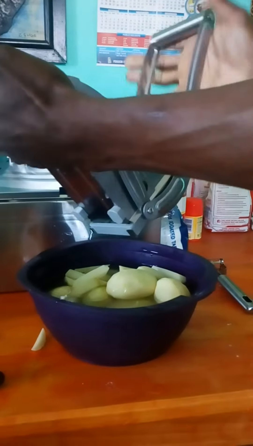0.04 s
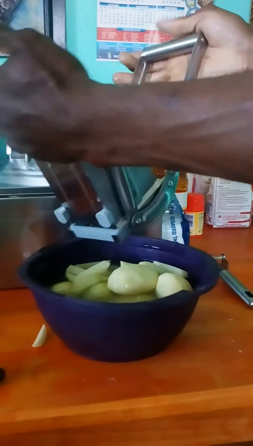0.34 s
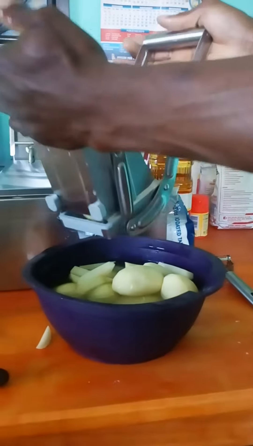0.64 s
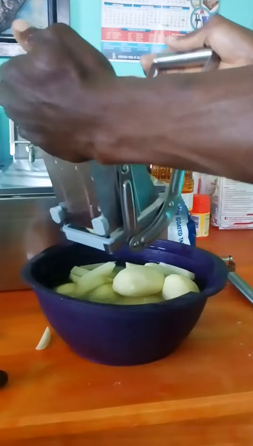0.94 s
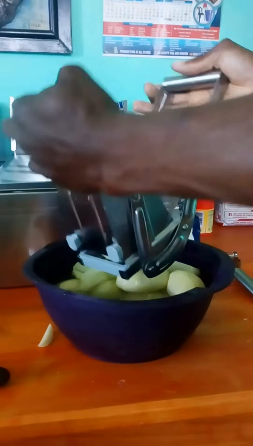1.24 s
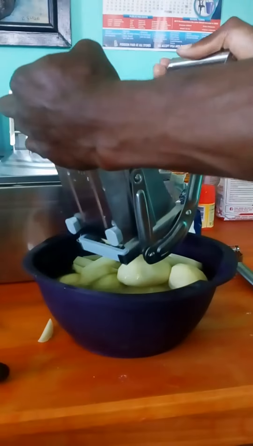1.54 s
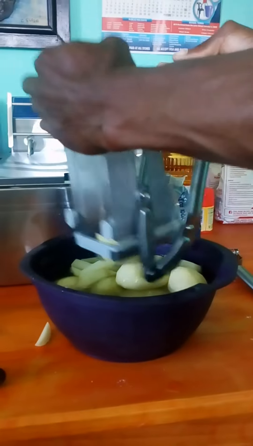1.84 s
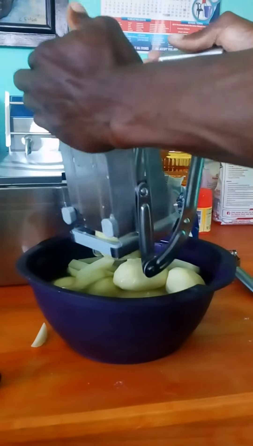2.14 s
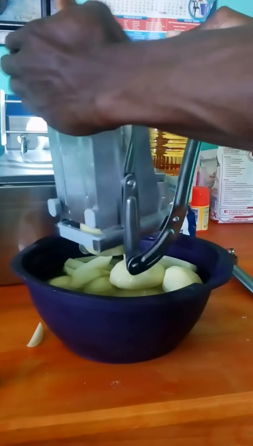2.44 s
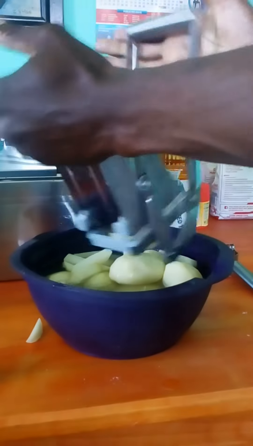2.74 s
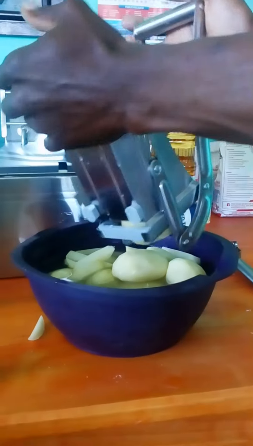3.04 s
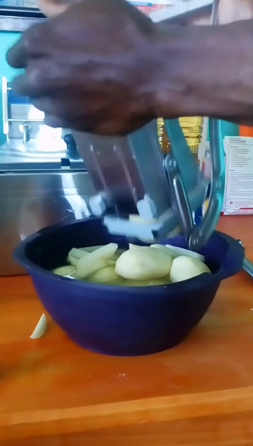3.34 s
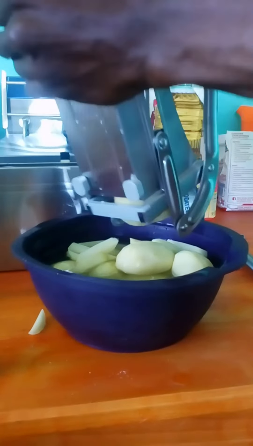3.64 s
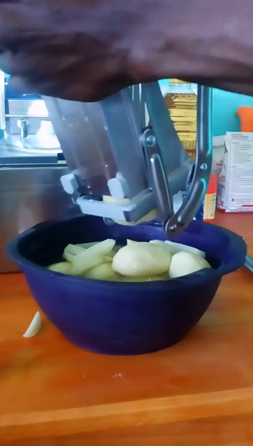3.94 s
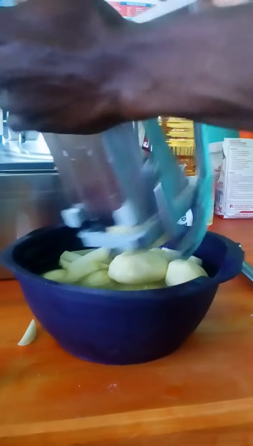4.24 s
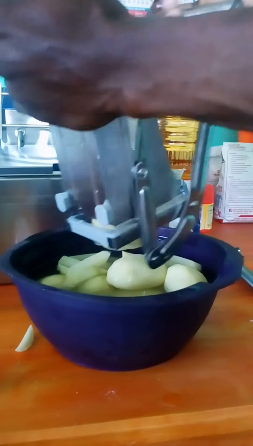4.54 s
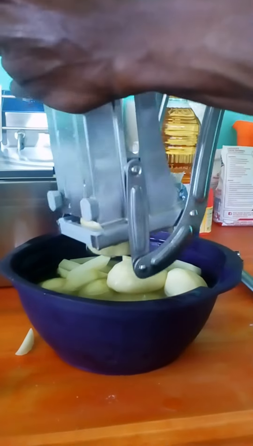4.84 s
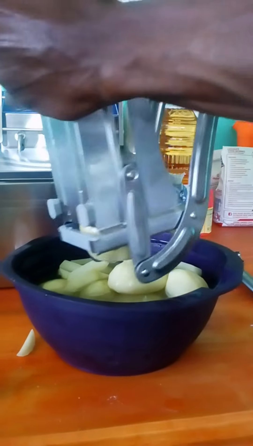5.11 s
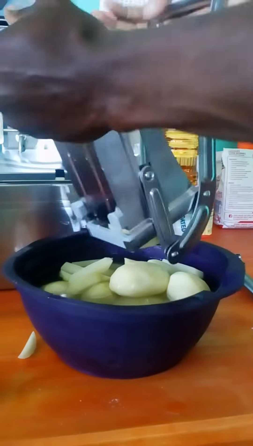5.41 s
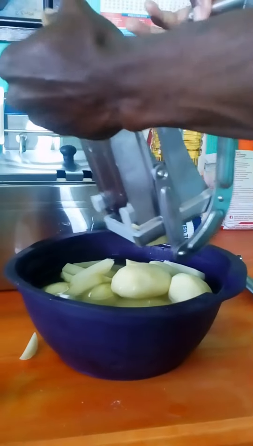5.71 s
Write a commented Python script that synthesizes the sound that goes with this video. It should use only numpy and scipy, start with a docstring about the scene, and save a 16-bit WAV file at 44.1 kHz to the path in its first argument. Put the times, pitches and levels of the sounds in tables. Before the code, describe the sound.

Close by, the loose joints of a metal potato cutter click and its pusher scrapes briefly along the guide. The pusher slams against its stop with a bright steel clack and a soft low thump. Things go nearly quiet, then a run of small metallic ticks and knocks builds to another loud clack. The small kitchen adds a short echo and a faint, steady motor hum with hiss.

```python
"""A steel lever chip cutter is worked over a bowl in a small kitchen. Twice its pusher drives a potato
through the blade grid and clashes against its stop. The loose linkage clicks, and each hit of steel on
steel makes the frame ring. The pusher scrapes along its guide. There are soft low thumps on the frame
and one faint, drawn-out groan. A motor, likely a fridge compressor, throbs faintly behind mains hum
and hiss."""
import sys
import numpy as np
from scipy import signal
from scipy.fft import rfft, irfft, next_fast_len
from scipy.io import wavfile
from scipy.ndimage import uniform_filter1d

SR = 44100
rng = np.random.default_rng(int(sys.argv[2]) if len(sys.argv) > 2 else 0)


def wav_record(signal):
    """Record a signal, one row per channel, as 16-bit PCM in the file named by sys.argv[1]."""
    frames = np.transpose(np.atleast_2d(signal))
    bounded = np.clip(frames, -1, 1)
    # unit amplitude maps onto the largest positive 16-bit level
    quanta = np.round(bounded * 32767).astype(np.int16)
    wavfile.write(sys.argv[1], SR, quanta)


N = 263277

# How long the kitchen echoes; a fade time is the time to drop 60 dB: (frequency [Hz], fade time [s])
ECHO_FADES = [(200, 0.346), (800, 0.264), (2100, 0.358), (5500, 0.2496), (15000, 0.226)]
# The tone of the background hiss: (frequency [Hz], relative level [dB])
HISS_TONE = [(20, -4.5), (40, -5), (90, 6), (200, 0.5), (400, -0.5), (750, -5.5), (1400, -5), (2500, -8.5),
             (4500, -10), (6300, -7.5), (7300, -14), (15500, -10.5)]
# Resonances of the motor's casing: (pitch [Hz], width [Hz], relative level [dB])
CASING_RESONANCES = [(151.8, 131.2, 1.5), (237, 121, -7.5), (531, 84.8, 4), (1088, 101, 0),
                     (1686, 260, -8.5)]
# Soft low thumps on the frame, and one faint, drawn-out groan:
# (middle time [s], half length [s], pitch [Hz], level [dB])
BUMPS_AND_GROAN = [(.9, 0.32, 570, -71.5), (1.758, 0.0063, 220, -60), (1.868, 0.0185, 354.3, -53),
                   (1.886, 0.0563, 172, -64.5), (2.804, 0.042, 90, -69.5), (2.902, 0.0336, 161.3, -64)]
# The notes at which the frame and blade grid ring: (pitch [Hz], relative level [dB], fade time [s])
FRAME_NOTES = [(779, 4, .28), (990, 0, .14), (1175, -2, .14), (1328, 1, .22), (1836, -3, .2),
               (2040, -2, .24), (2660, -7, .2), (2783, -6, .22), (3012, -4, .18), (3725, -3, .18),
               (3931, -4, .18), (4075, -3, .15), (4964, -4, .18), (5389, -3, .17), (5636, -3, .17),
               (5768, -4, .17), (5893, -4, .18), (6075, -2, .2), (6130, -3, .2), (6260, -5, .22),
               (6414, -1, .21), (6647, -1, .19), (6932, -1, .18), (7020, -1, .19), (7158, 0, .21)]
# Resonances of the pusher's guide: (pitch [Hz], width [Hz], relative level [dB])
GUIDE_RESONANCES = [(1010, 710, 1.5), (1738, 111, 7.5), (2840, 630, 1), (3954, 720, 1.5), (4642, 427, 7),
                    (5190, 140, 2)]
# The pusher sliding in its guide: (middle time [s], half length [s], relative level [dB])
SLIDES = [(0.11, 0.045, -66), (0.462, 0.0322, -59), (0.566, 0.01854, -38.5), (1.0, 0.19, -72),
          (1.79, 0.11, -66.5), (1.87, 0.01793, -32.5), (2.77, 0.0263, -65.5), (4.263, 0.04, -69),
          (5.535, 0.01598, -63.5), (5.954, 0.01236, -28.5)]
# The tone of a steel clack: (frequency [Hz], relative level [dB])
CLACK_TONE = [(150, -47), (420, -16), (750, -8), (1500, -4), (2150, -7.5), (2800, -3), (3900, -1.5),
              (4600, -5), (5400, -1), (8000, -7.5), (16000, -21.5)]
# Clicks of the loose linkage: (time [s], relative ping level [dB], knock level [dB], knock pitch [Hz],
# ping pitch [Hz], fade time [s], opening snap against the hit [dB], chatter length [s],
# first hit against the last [dB])
LINKAGE_CLICKS = [ (0.312, -54.5, -69.5, 1310, 6136, 0.041, -7, 0, -5),
                  (0.404, -46.5, -66.5, 1124, 6530, 0.1216, -20.5, 0.0114, 1.5),
                  (0.536, -40, -58.5, 1740, 6400, 0.07, -19.5, 0.0034, -1.5),
                  (0.6719, -43, -82, 1054, 6120, 0.0155, -3, 0.0194, -5),
                  (2.162, -58.5, -67.5, 1300, 6050, 0.0257, -7, 0, -0.5),
                  (3.3496, -42.5, -54, 1626, 5500, 0.0532, 8.5, 0.003, -6.5),
                  (4.0444, -54.5, -52, 987.5, 6703, 0.035, -2.5, 0.000097, 0),
                  (4.23, -67, -55.5, 1317, 6432, 0.0287, -16.5, 0.0025, 5),
                  (4.3823, -42, -42, 1307, 6373, 0.0402, -19.5, 0.00437, -8.5),
                  (4.5501, -52.5, -66, 1098, 5782, 0.0329, 3.5, 0.00016, -1.5),
                  (4.6294, -59, -49.5, 939.5, 5999, 0.0196, -14.5, 0, -1),
                  (4.6842, -53, -61.5, 1700, 6440, 0.0217, -6.5, 0, 0),
                  (4.7387, -45, -55, 1545, 6339, 0.0246, -6.5, 0, 0),
                  (4.8692, -46, -63, 1860, 5991, 0.0567, 5.5, 0.0096, -2.5),
                  (5.140, -59.5, -59, 1308, 6304, 0.0511, -17.5, 0.00029, -4.5),
                  (5.4413, -42, -53, 1141, 6643, 0.04316, -9.5, 0.0172, 4.5),
                  (5.523, -68.5, -52.5, 856, 6401, 0.02705, -8.5, 0.00032, 1.5),
                  (5.7671, -34, -62.5, 1100, 7040, 0.0293, -17, 0, 0)]
# Strokes through the grid: (first touch [s], stop time [s], relative ping level [dB], knock level [dB],
# knock pitch [Hz], ping pitch [Hz], sizzle level [dB], first touch against the stop [dB],
# rebound against the stop [dB])
CUTTING_STROKES = [(1.8367, 1.8733, -21.5, -29, 863.4, 7040, -35.5, -9.5, -14),
                   (5.9266, 5.945, -22, -21, 993.3, 6750, -24, -21.5, -4)]
# How the microphone colours the sound: (frequency [Hz], gain [dB])
MIC_TONE = [(6900, -1.5), (7400, -6), (8200, -11.5), (10000, -13), (13600, -16), (14500, -5), (15200, -5.5),
            (15700, -5)]


def amp(db):
    """Turn decibels into a gain to multiply by."""
    return 10 ** (np.asarray(db) / 20)


def unit(x):
    """Scale x to an average (rms) level of 1."""
    return x / np.sqrt(np.mean(x ** 2) + 1e-20)


def along(points, hz):
    """Read between the rows of a (frequency, value) table, on a log frequency scale."""
    f, values = np.transpose(points)
    return np.interp(np.log(hz + 1), np.log(f), values)


def filtered(x, response):
    """Shape x with a response: a function that gives the gain and phase at each frequency."""
    size = next_fast_len(len(x) + 8192)
    return irfft(rfft(x, size) * response(np.fft.rfftfreq(size, 1 / SR)), size)[:len(x)]


def resonance(f, hz, width_hz):
    """The response of something that vibrates most easily near one pitch."""
    return 1j * f * width_hz / (hz * hz - f * f + 1j * f * width_hz)


def highpass(f, corner_hz):
    """A response that steeply cuts everything below the corner."""
    return f ** 4 / np.sqrt(f ** 8 + corner_hz ** 8)


def noise(size, response):
    """Noise shaped by a response, at level 1."""
    return unit(filtered(rng.standard_normal(size), response))


def add(track, start_s, sound):
    """Mix a sound into the track at the given time."""
    start = round(start_s * SR)
    part = sound[:max(len(track) - start, 0)]
    track[start:start + len(part)] += part


def swell(middle_s, half_s):
    """A bell-shaped rise and fall around a moment."""
    return np.exp(-.5 * ((np.arange(N) / SR - middle_s) / half_s) ** 2)


def fade(t, fade_s):
    """A gain that drops by 60 dB every fade_s seconds."""
    return amp(-60 * t / fade_s)


def in_kitchen(x, echo_db):
    """Add the echo of the walls, in which the highest sounds die first."""
    hz, t, spectrum = signal.stft(rng.standard_normal(SR // 2), SR, nperseg=256)
    echo = signal.istft(spectrum * fade(t, along(ECHO_FADES, hz)[:, None]), SR, nperseg=256)[1]
    echo *= 1 - np.exp(-np.arange(len(echo)) / SR / 0.00614)  # reflections take a moment to build up
    return x + amp(echo_db) * signal.fftconvolve(x, echo / np.linalg.norm(echo))[:len(x)]


def hiss():
    """A steady, quiet hiss, strongest in the bass."""
    return amp(-62) * noise(N, lambda f: amp(along(HISS_TONE, f)))


def motor(knock_hz=24.368, mains_hz=50.1):
    """A soft knock every second turn of the shaft rings the casing, while the windings hum."""
    times = np.arange(.0365, N / SR - .01, 1 / knock_hz)
    knocks = np.zeros(N)
    knocks[(times * SR).astype(int)] = amp(rng.standard_normal(len(times)))
    casing = lambda f: sum(amp(db) * resonance(f, hz, width) ** 2 for hz, width, db in CASING_RESONANCES)
    throb = unit(in_kitchen(filtered(knocks, casing), echo_db=-13.5))
    hum = np.sin(2 * np.pi * mains_hz * np.arange(N) / SR)
    return amp(-70.5) * throb + amp(-63.5) * hum


def bumps_and_groan():
    """Swells of noise around one low pitch each: the short ones thump, the long one groans faintly."""
    return sum(amp(db) * swell(middle_s, half_s) * noise(N, lambda f: resonance(f, hz, width_hz=87) ** 2)
               for middle_s, half_s, hz, db in BUMPS_AND_GROAN)


def frame_ring(t, force):
    """Each note of the frame rings as hard as the force drives its pitch, give or take a little."""
    hz, db, fade_s = np.transpose(FRAME_NOTES)
    strengths = np.abs(force(hz)) * amp(db + 2 * rng.standard_normal(len(hz)))
    phases = rng.uniform(0, 2 * np.pi, (len(hz), 1))
    return strengths @ (np.sin(2 * np.pi * hz[:, None] * t + phases) * fade(t, fade_s[:, None]))


def slips():
    """Countless tiny slips of sliding steel: noise whose level flickers slightly."""
    grain = rng.standard_normal(N)
    flicker_db = 0.94 * unit(uniform_filter1d(rng.standard_normal(N), size=60))
    return grain * amp(flicker_db)


def scrapes():
    """The sliding pusher sounds its guide and sets the frame ringing."""
    ping = unit(filtered(slips(), lambda f: resonance(f, hz=6303, width_hz=920)))
    guide = lambda f: sum((-1) ** k * amp(db) * resonance(f, hz, width)
                          for k, (hz, width, db) in enumerate(GUIDE_RESONANCES))
    body = unit(filtered(slips(), lambda f: guide(f) * highpass(f, corner_hz=598)))
    loudness = sum(amp(db) * swell(middle_s, half_s) for middle_s, half_s, db in SLIDES)
    rubbing = loudness * (amp(-1) * ping + amp(-8.5) * body)
    frame = frame_ring(np.arange(SR // 2) / SR, force=np.ones_like)
    ringing = signal.fftconvolve(rubbing, frame / np.linalg.norm(frame))[:N]
    return in_kitchen(rubbing + amp(-16.5) * ringing, echo_db=-9.5)


def steel_hit(ping_db, knock_db, sizzle_db, knock_hz, ping_hz, fade_s, snap_db, ring_db):
    """Steel meets steel: a low knock, a clack and a bright ping, damped by the hands, then a thin ring."""
    t = np.arange(SR // 2) / SR
    clack_hz = 3685 * np.exp(.15 * rng.standard_normal())  # a little different on every hit
    knock = lambda f: resonance(f, knock_hz, width_hz=400) ** 2 * highpass(f, corner_hz=0.535 * knock_hz)
    clack = lambda f: amp(along(CLACK_TONE, f))
    ping = lambda f: resonance(f, ping_hz, width_hz=2180) ** 3
    # Each part is a crowd of short notes, made as noise, around one longer leading note:
    # (level [dB], tone, leading pitch [Hz], leading note against its crowd [dB])
    parts = [(knock_db, knock, knock_hz, -7),
             ((ping_db + knock_db) / 2 + 1.5, clack, clack_hz, -11),
             (ping_db - 2, ping, ping_hz, -9)]
    crowd = sum(amp(db) * noise(len(t), tone) for db, tone, _, _ in parts)
    sizzle = amp(sizzle_db) * noise(len(t), lambda f: highpass(f, corner_hz=7400))
    snap = amp(snap_db) * np.exp(-t / 0.00067)  # extra strength in the first instant
    burst = (crowd + sizzle) * (fade(t, fade_s) + snap)
    leading = sum(amp(db + lead_db) * np.sin(2 * np.pi * (hz * t + rng.random()))
                  for db, _, hz, lead_db in parts)
    force = lambda f: sum(amp(db) * np.abs(tone(f)) for db, tone, _, _ in parts)
    hit = burst + leading * fade(t, 1.6 * fade_s) + amp(ring_db) * frame_ring(t, force)
    onset = 1 - np.exp(-t / 0.000108)
    return in_kitchen(hit * onset, echo_db=-9.5)


def chatter(start_s, length_s, gap_s=.009):
    """Evenly spaced moments at which loose steel strikes; a length of zero gives just one."""
    gaps = max(int(length_s / gap_s), int(length_s > 0))
    return np.linspace(start_s, start_s + length_s, gaps + 1)


def linkage_clicks():
    """A loose joint strikes once, or chatters as it closes or comes to rest."""
    track = np.zeros(N)
    for start, ping_db, knock_db, knock_hz, ping_hz, fade_s, snap_db, length, first_db in LINKAGE_CLICKS:
        times = chatter(start, length)
        sizzle_db = ping_db - 12.5 + 36 * np.log2(ping_hz / 6370)  # higher pings sizzle more
        for at, db in zip(times[::-1], np.linspace(0, first_db, len(times))):  # last hit first
            hit = steel_hit(ping_db, knock_db, sizzle_db, knock_hz, ping_hz, fade_s, snap_db, ring_db=-21.5)
            add(track, at, amp(db) * hit)
    return track


def pusher_chops(growth_db=2, rebound_s=.0062):
    """The pusher chatters into the grid ever harder, slams against its stop and bounces once."""
    track = np.zeros(N)
    heavy = dict(fade_s=0.0529, snap_db=-32.5, ring_db=-22)  # the heavy pusher rings on and barely snaps
    for stroke in CUTTING_STROKES:
        touch_s, stop_s, ping_db, knock_db, knock_hz, ping_hz, sizzle_db, touch_db, rebound_db = stroke
        for k, at in enumerate(chatter(touch_s, stop_s - touch_s)[:-1]):
            hit = steel_hit(ping_db, knock_db - 2.5, sizzle_db, knock_hz, ping_hz=6460, **heavy)
            add(track, at, amp(touch_db + k * growth_db) * hit)
        for at, db in [(stop_s, 0), (stop_s + rebound_s, rebound_db)]:
            hit = steel_hit(ping_db, knock_db, sizzle_db, knock_hz, ping_hz, **heavy)
            add(track, at, amp(db) * hit)
    return track


def scene():
    """The cutter close by, over the quiet of the kitchen."""
    return (hiss() + motor() + pusher_chops() + linkage_clicks() + scrapes() + bumps_and_groan())[None]


def record(dry):
    """A small microphone, dull above 7 kHz, whose opening resonates near the top of its range."""
    top_hz = 15700
    return filtered(dry[0], lambda f: amp(along(MIC_TONE, f)) * (f < top_hz))[None]


dry = scene()
out = record(dry)
wav_record(out)
```